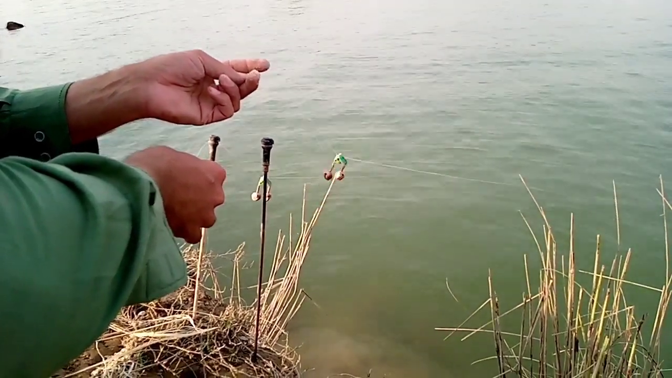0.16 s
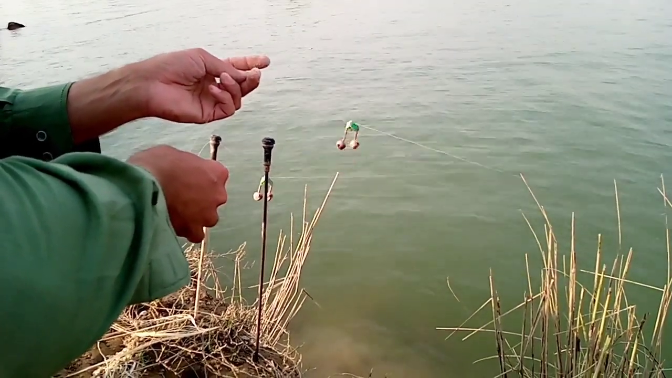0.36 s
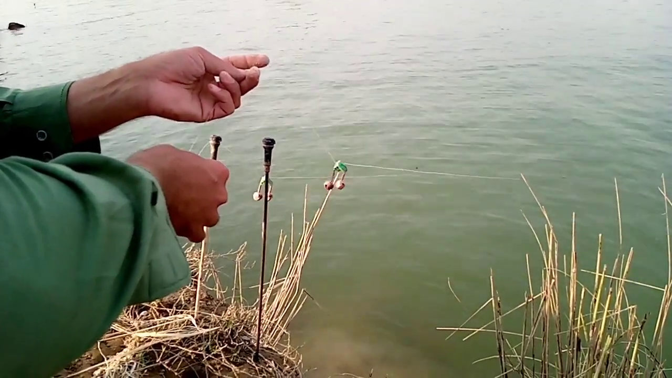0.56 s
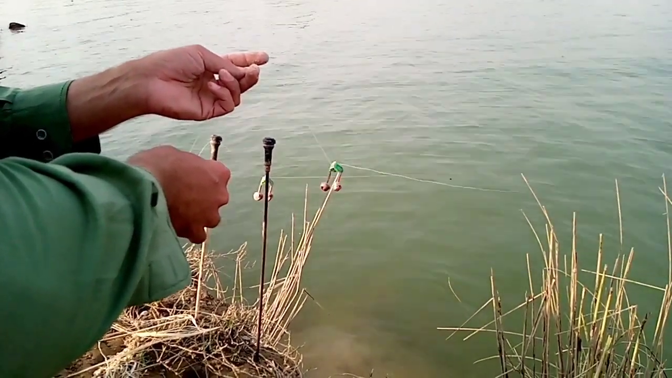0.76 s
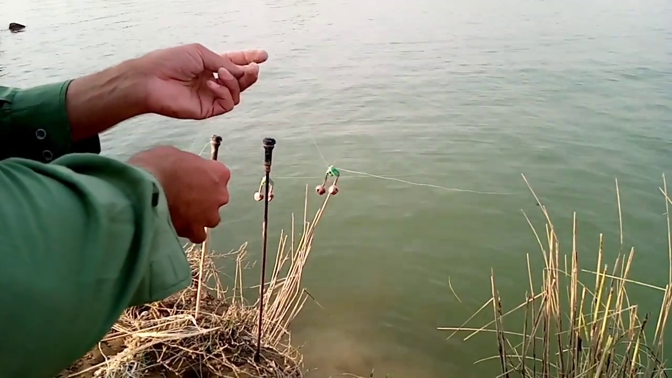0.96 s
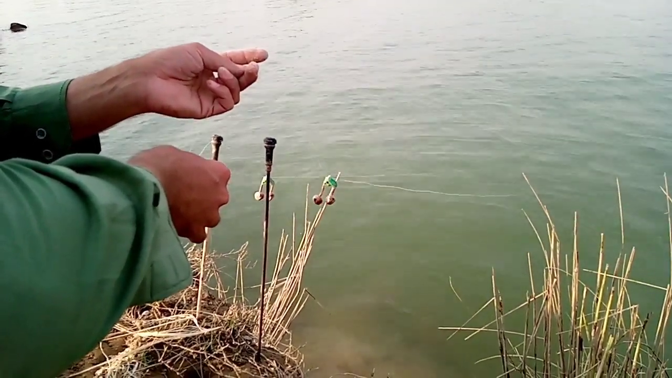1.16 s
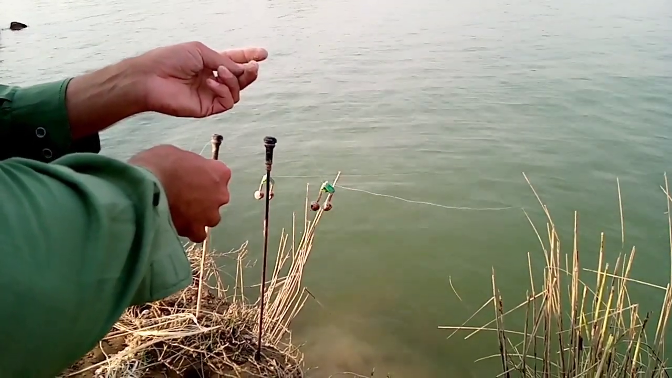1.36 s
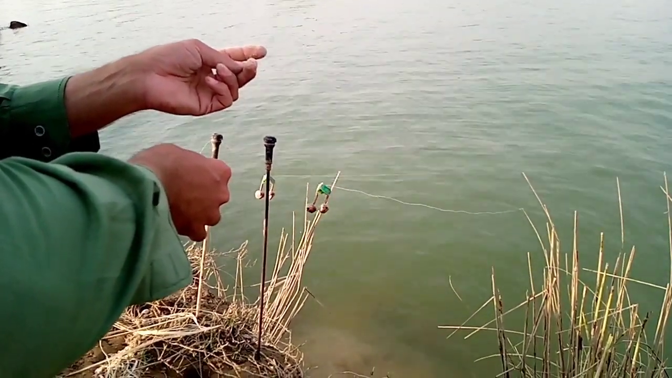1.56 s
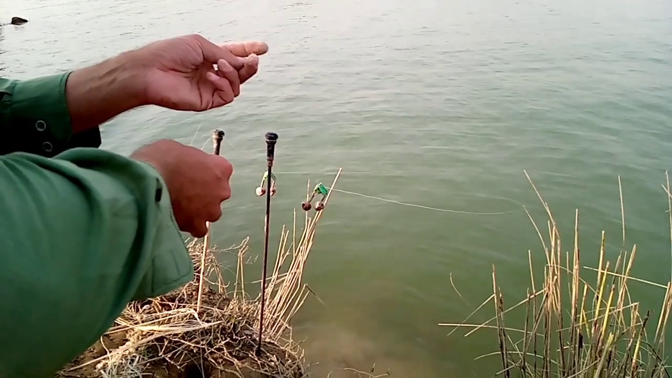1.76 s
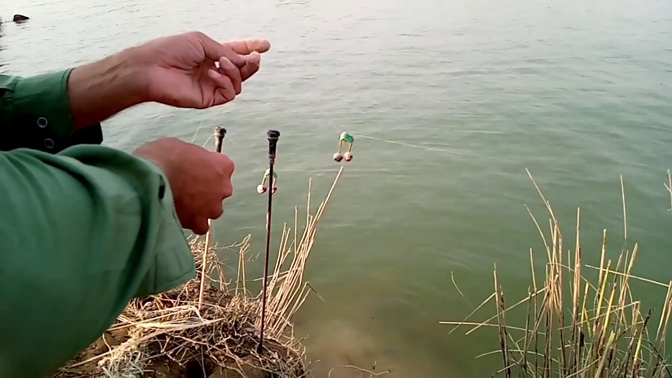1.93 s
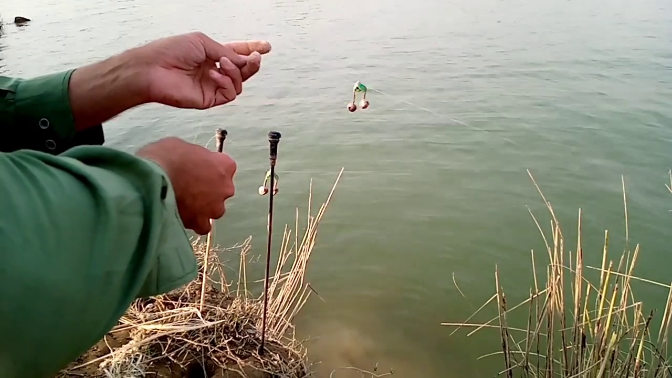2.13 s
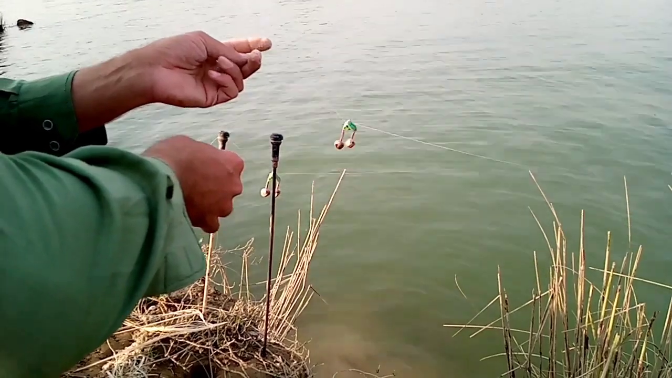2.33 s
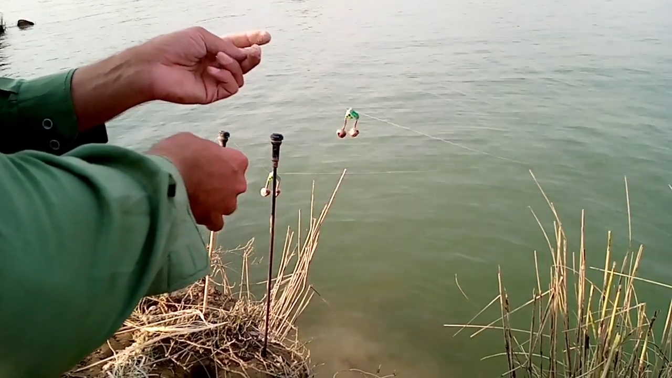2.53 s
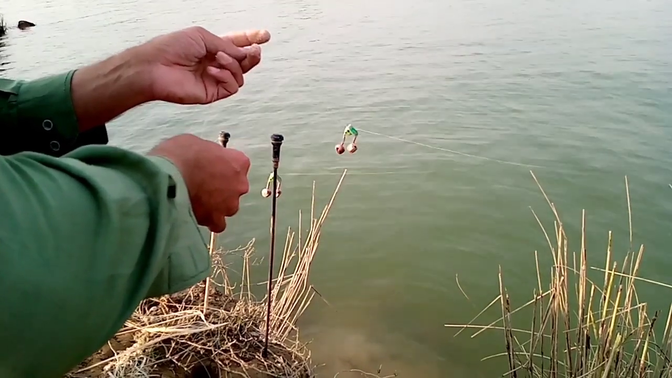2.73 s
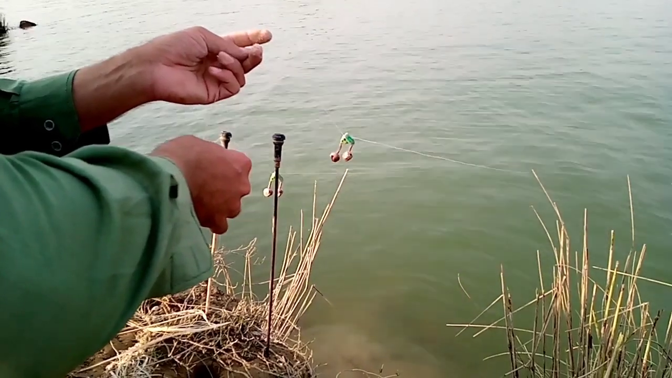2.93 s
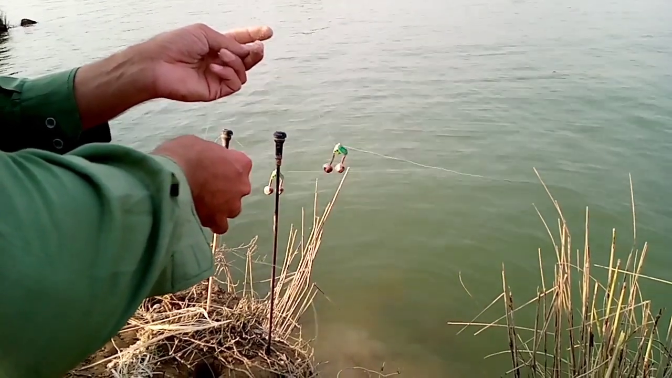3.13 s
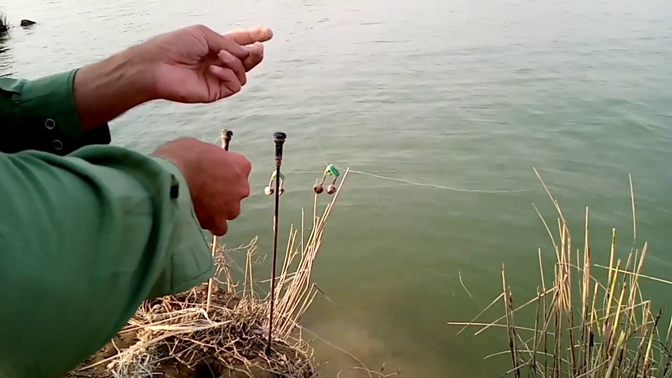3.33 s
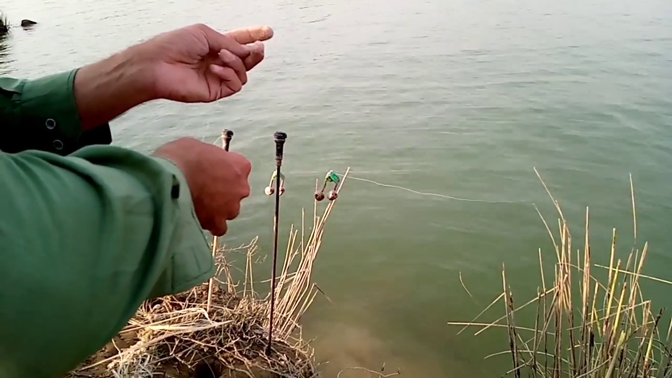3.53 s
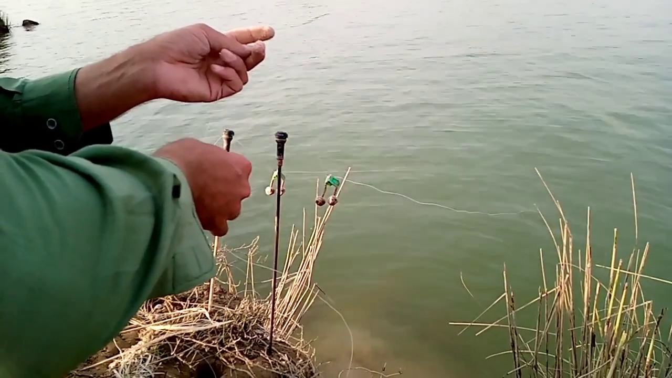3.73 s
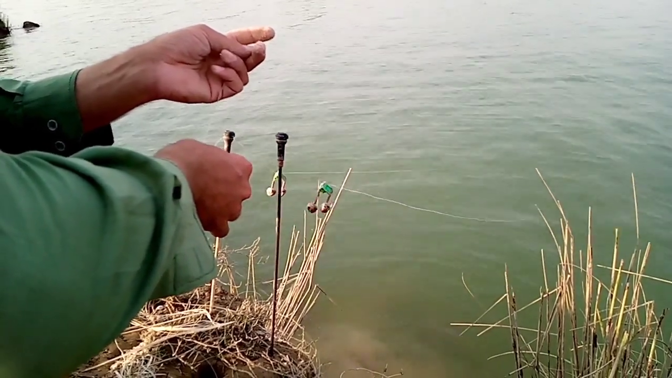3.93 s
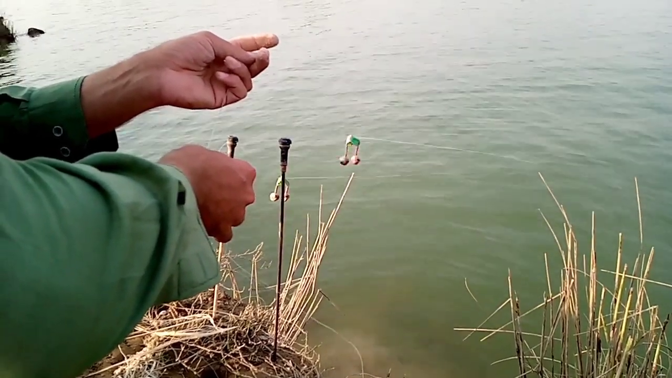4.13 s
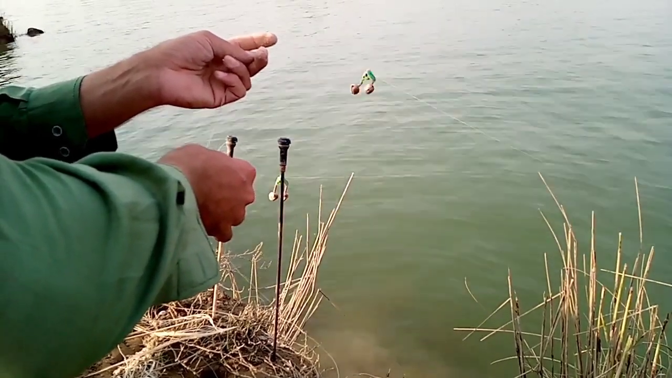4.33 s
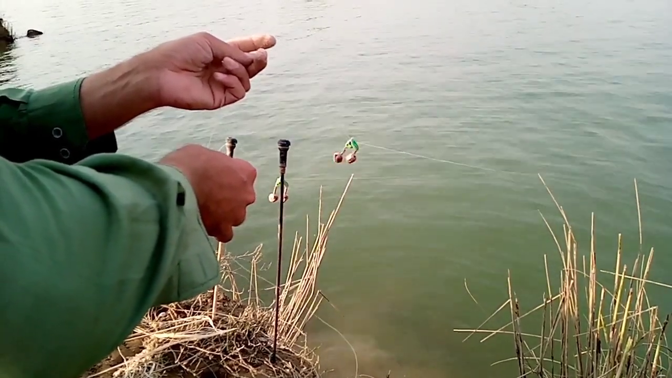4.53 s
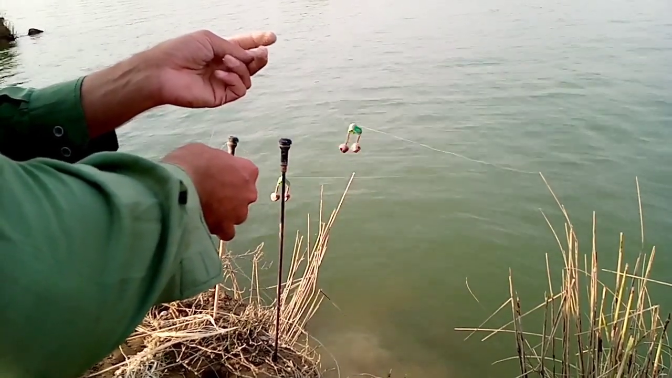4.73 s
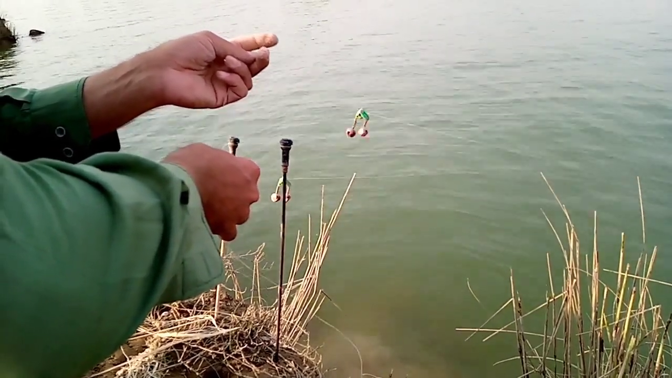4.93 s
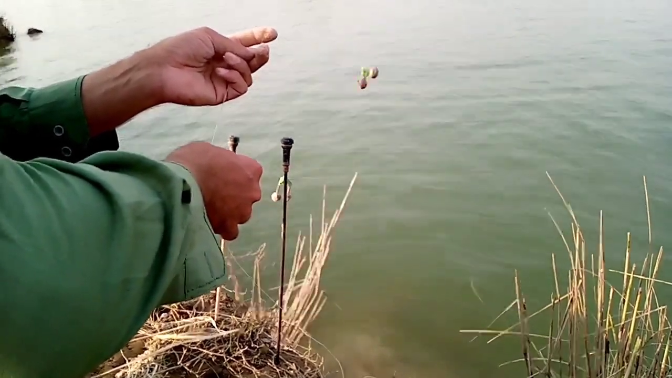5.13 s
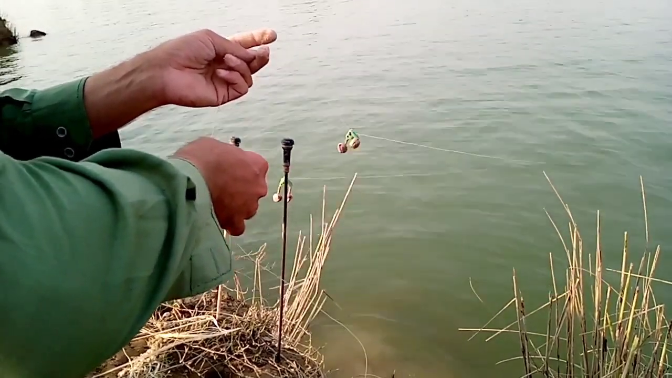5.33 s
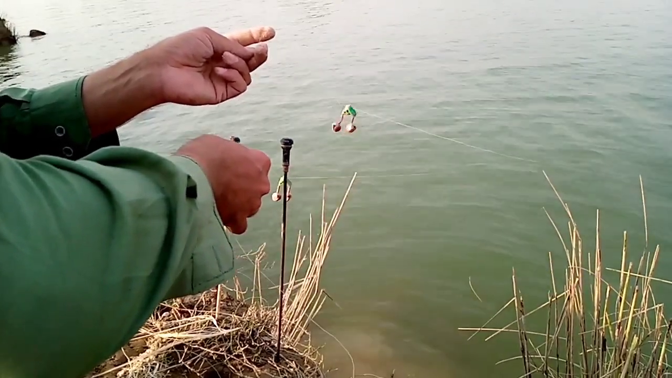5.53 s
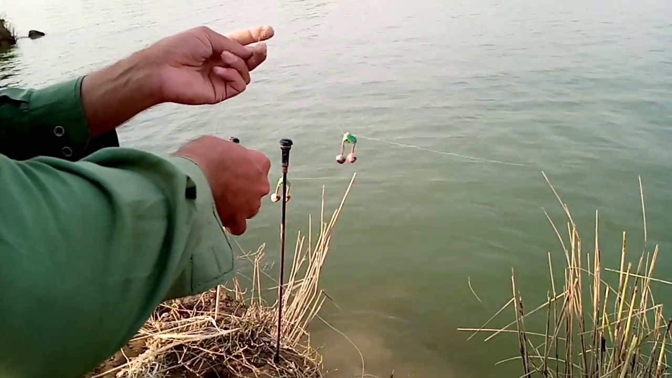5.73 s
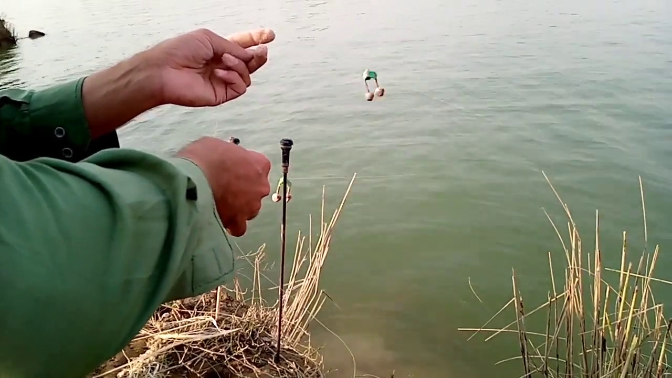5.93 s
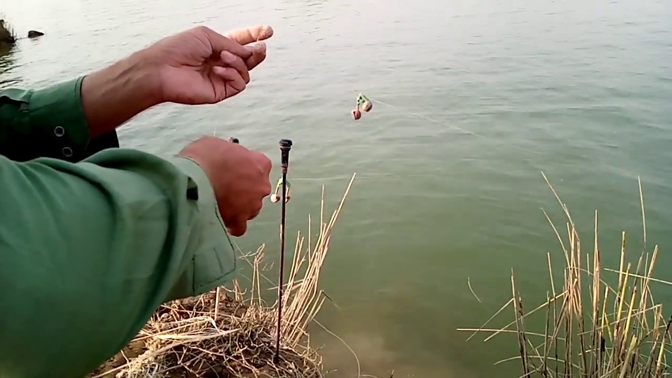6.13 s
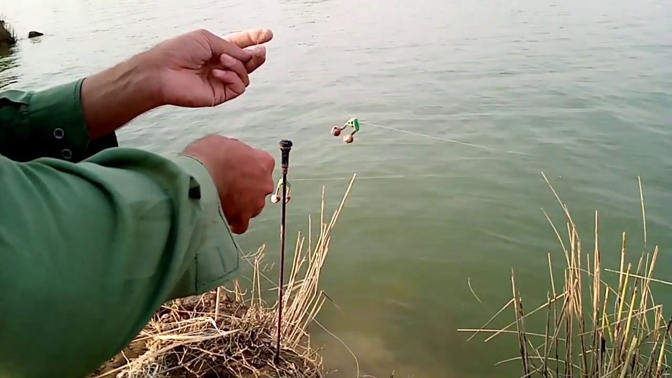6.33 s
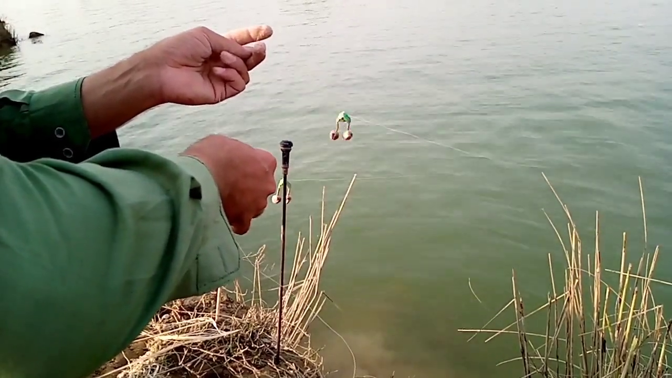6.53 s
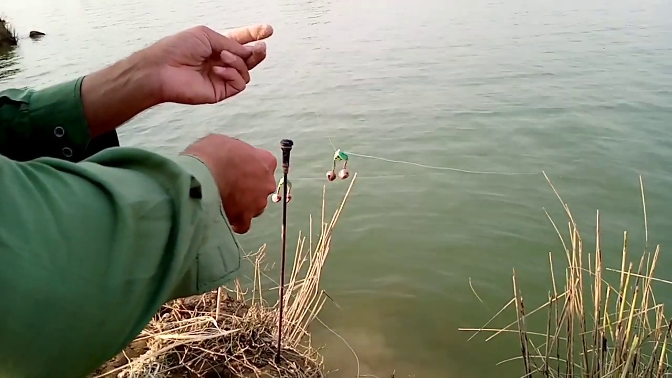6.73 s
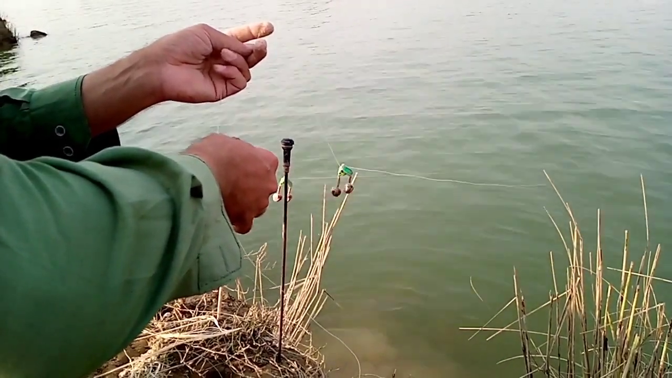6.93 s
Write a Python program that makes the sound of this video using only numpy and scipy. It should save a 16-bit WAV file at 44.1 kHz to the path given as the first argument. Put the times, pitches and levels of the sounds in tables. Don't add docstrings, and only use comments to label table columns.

```python
import sys
import numpy as np
from scipy import signal
from scipy.io import wavfile

SR = 44100
rng = np.random.default_rng(int(sys.argv[2]) if len(sys.argv) > 2 else 0)


def log_audio(samples):
    frames = np.atleast_2d(samples).T
    limited = np.clip(frames, -1, 1)
    pcm = np.round(limited * 32767).astype(np.int16)
    wavfile.write(sys.argv[1], SR, pcm)


def elevation(decibels):
    levels = np.asarray(decibels, float)
    return 10 ** (levels / 20)


N = 308259
TIME = np.arange(N) / SR


def rms_one(x):
    return x / np.sqrt(np.mean(x ** 2) + 1e-20)


def low_pass(x, hz):
    r = np.exp(-2 * np.pi * hz / SR)
    return signal.lfilter([1 - r], [1, -r], x)


def band_pass(x, low_hz, high_hz, order):
    return signal.sosfilt(signal.butter(order, [low_hz, high_hz], "band", fs=SR, output="sos"), x)


def drift(rate_hz):
    thin = 40
    r = np.exp(-2 * np.pi * rate_hz * thin / SR)
    white = rng.standard_normal(N // thin + 2002)
    slow = signal.lfilter([1], [1, -2 * r, r * r], white)[2000:]
    return np.interp(np.arange(N) / thin, np.arange(len(slow)), rms_one(slow))


def ring(clicks, hz, t60):
    r = 10 ** (-3 / (t60 * SR))
    w = 2 * np.pi * hz / SR
    return signal.lfilter([0, np.sin(w)], [1, -2 * r * np.cos(w), r * r], clicks + 1e-18)


def banded_noise(spectrum, patchy_db, rate_hz):
    hz, db = np.transpose(spectrum)
    edges = np.geomspace(hz[0], hz[-1], 16)
    white = rng.standard_normal((2, N + SR))
    together = drift(2.47)
    out = 0
    for k, (low, high) in enumerate(zip(edges, edges[1:])):
        band = band_pass(white[k % 2], low, high, order=2)[SR:]
        level_db = np.interp(np.log(low * high) / 2, np.log(hz), db)
        flicker_db = patchy_db * (.5 * together + drift(rate_hz))
        out = out + band * elevation(level_db + flicker_db)
    return rms_one(out)


# (f/Hz, level/dB per Hz)
AIR_SPECTRUM = [(190, -22), (270, -4), (630, -7.5), (1600, -9), (3000, -10.5), (4300, -11), (6000, -11.5)]


def open_air():
    return elevation(-75.5) * banded_noise(AIR_SPECTRUM, patchy_db=3.0, rate_hz=40)


# (f/Hz, level/dB per Hz)
RUMBLE_SPECTRUM = [(28, -24), (60, -8), (100, 1.5), (135, -1.5), (260, -25.5)]
# (t/s, level/dB)
RUMBLE_SWELL = [
    (0, 3),
    (.7, 0.5),
    (1.4, 0),
    (2.25, 4),
    (2.9, 0.5),
    (3.6, -0.5),
    (4.3, -1.5),
    (4.8, 0),
    (6.3, 3.5),
    (7, -1.5),
]


def traffic_rumble():
    level_db = -67 + np.interp(TIME, *np.transpose(RUMBLE_SWELL)) + 1.97 * drift(20)
    return elevation(level_db) * banded_noise(RUMBLE_SPECTRUM, patchy_db=3.5, rate_hz=3.3)


# (f/Hz, level/dB per Hz)
HISS_SPECTRUM = [(5500, -2), (9000, -11), (13600, -11.5), (15000, -5.5), (16500, 1)]


def microphone_hiss():
    return elevation(-80) * banded_noise(HISS_SPECTRUM, patchy_db=-1.0, rate_hz=5.9)


def wing_strokes(s, level_db, hz, length, sag_hz):
    out, t = np.zeros(N + SR), np.arange(int(length * SR)) / SR
    swell = np.sin(np.pi * t / length) ** 0.91
    for at, db, f, turn in zip(s, level_db, hz, rng.random(len(s))):
        i = int(max(at, 0) * SR)
        cycles = f * t - sag_hz * t ** 2 / length + turn
        out[i:i + len(t)] += elevation(db) * swell * np.sin(2 * np.pi * cycles)
    return out[:N]


# (first chirp t/s, last chirp t/s, first f/Hz,
# last f/Hz)
CRICKET_BOUTS = [(0, .361, 7330, 7390), (.03, .157, 6900, 6920), (.251, .251, 6700, 6620),
                 (0.336, .924, 6570, 6750), (0.891, .889, 7360, 7100), (1.03, 1.704, 7370, 7340),
                 (1.209, 1.209, 6820, 6680), (1.487, 2.322, 6770, 6960), (2.432, 2.988, 7256, 7390),
                 (2.564, 2.913, 6610, 6750), (3.069, 3.143, 6940, 6750), (3.293, 3.76, 6880, 7140),
                 (3.899, 4.482, 6680, 6760), (3.919, 3.921, 7300, 7240), (4.005, 4.562, 7340, 7420),
                 (4.553, 5.118, 6940, 7040), (4.888, 4.889, 6650, 6650), (5.135, 5.61, 6610, 6760),
                 (5.238, 5.238, 7540, 7540), (5.37, 5.815, 7300, 7350), (5.876, 6.432, 6915, 6980),
                 (6.219, 6.219, 6600, 6630), (6.533, 6.961, 7380, 7480), (6.554, 6.813, 6780, 6710)]


def chirp_times():
    chirp_s = .115
    runs = []
    for s0, s1, hz0, hz1 in CRICKET_BOUTS:
        runs.append(np.linspace([s0, hz0], [s1, hz1], round((s1 - s0) / chirp_s) + 1))
    s, hz = np.concatenate(runs).T
    return s, hz + 35.0 * rng.standard_normal(len(s))


# (start t/s, end t/s, level/dB)
CRICKET_TRILLS = [
    (.98, 1.72, -79),
    (3.3, 4.0, -79),
]


def crickets():
    s, hz = chirp_times()
    level_db = np.where(hz > 7200, -69, -64) + rng.normal(0, 0.17, len(s))
    step = np.arange(5) - 2
    fade_db = np.array([-2.5, 1.0, 0.0, 2, -6.0])
    luck = rng.standard_normal((len(s), 3, 5)) * [[.0004], [1.5], [25]]
    stroke_s = s[:, None] + step / 72 - .005 + luck[:, 0]
    stroke_db = level_db[:, None] + 6.0 + fade_db + luck[:, 1]
    stroke_hz = hz[:, None] + 230 + 25 * step + luck[:, 2]
    near = wing_strokes(stroke_s.ravel(), stroke_db.ravel(), stroke_hz.ravel(), length=0.009, sag_hz=235)
    low = band_pass(near, 6200, 7150, order=2)
    near += elevation(-7) * np.roll(low, int(.0061 * SR))
    for start, end, db in CRICKET_TRILLS:
        at = np.arange(start, end, 1 / 57)
        rise = np.minimum((at - start) / 0.2, 1)
        trill_db = db + rng.normal(0, 2.5, 99)[:len(at)]
        near += wing_strokes(at, trill_db, 7750 + 270 * rise, length=.009, sag_hz=60)
    white = rng.standard_normal(N)
    low_choir_db = -70.5 + 2.5 * drift(32) + 2.2 * drift(71)
    chorus = rms_one(band_pass(white, 6340, 6785, order=3)) * elevation(low_choir_db)
    chorus += rms_one(band_pass(white, 6800, 7350, order=3)) * elevation(-80 + 2.5 * drift(3))
    return near + chorus


# (start t/s, end t/s, start f/Hz, end f/Hz, level/dB)
BIRD_AND_FROG_CALLS = [(.612, .736, 2550, 2030, -76), (.74, .997, 2034, 1710, -73.5),
                       (1.03, 1.256, 1478, 1342, -70.5), (1.125, 1.26, 3370, 2660, -86),
                       (1.168, 1.419, 2250, 1917, -76), (1.32, 1.5, 2530, 2330, -80),
                       (1.101, 1.274, 1800, 1610, -75.5), (1.07, 1.15, 1080, 710, -75.5),
                       (2.542, 2.626, 908, 898, -80.5), (2.684, 2.919, 1735, 1591, -76),
                       (3.842, 4.257, 1780, 1638, -75), (4.23, 4.32, 860, 885, -76.5),
                       (5.678, 5.973, 1428, 1484, -78), (5.72, 5.955, 1888, 1780, -76.5),
                       (5.782, 5.932, 830, 847, -76), (6.659, 6.886, 1423, 1396, -77.5),
                       (6.885, 6.95, 2500, 1900, -82), (6.94, 7.02, 3740, 3350, -71),
                       (4.905, 4.925, 7300, 3200, -61), (0.15, .29, 1200, 1002, -78.5)]


def far_calls():
    hoarse_share, clear_above_hz = 0.077, 2670
    out, luck = np.zeros(N), rng.random((170, 5))
    start, hz = 6.9 * luck[:, 0], 1100 * 4.5 ** luck[:, 1]
    end = start + .03 + 0.054 * luck[:, 2]
    end_hz = hz * (0.88 + 0.11 * luck[:, 3])
    murmur = np.transpose([start, end, hz, end_hz, -92 + 8.4 * luck[:, 4]])
    for start, end, hz_a, hz_b, level_db in [*BIRD_AND_FROG_CALLS, *murmur]:
        hoarse_hz = hoarse_share * hz_b
        rough = 1 / (1 + (hz_b / clear_above_hz) ** 8)
        i = int(start * SR)
        u = np.linspace(0, 1, int((end - start) * SR))[:N - i]
        white = rng.standard_normal(SR // 2)[:len(u)]
        flutter = rms_one(low_pass(low_pass(white, hoarse_hz), hoarse_hz))
        tone = np.sin(2 * np.pi * np.cumsum(hz_a * (hz_b / hz_a) ** u) / SR)
        swell = np.sin(np.pi * u) ** 0.25
        voice = 1.5 - 0.82 * rough + rough * flutter
        out[i:i + len(u)] += elevation(level_db + 2.5) * swell * voice * tone
    t = np.arange(SR // 5) / SR
    scatter = rng.standard_normal(len(t)) * elevation(-60 * t / 0.12)
    smear = signal.fftconvolve(out, scatter / np.linalg.norm(scatter))[:N]
    return out + elevation(-0.5) * smear


# (t/s, peak level/dB, f/Hz, cycles rung)
SNAPS_DRIPS_AND_TINKLES = [(.161, -43.5, 4000, 5.6), (1.071, -39, 8640, 17), (1.309, -47.5, 1920, 4),
                           (1.834, -45, 2400, 62), (1.82, -48.5, 4130, 16), (1.838, -49, 8940, 3.1),
                           (3.042, -45.5, 5100, 16.7), (3.654, -61, 2580, 11), (3.666, -47, 3900, 11),
                           (4.232, -55.5, 1617, 57), (4.232, -65, 814, 67), (4.264, -56, 1396, 90),
                           (4.377, -58.5, 1940, 49), (5.865, -54.5, 1373, 25), (4.749, -49.5, 195, 4),
                           (4.79, -57, 297, 3.6), (5.621, -57, 193, 31), (6.038, -49.5, 2720, 44),
                           (6.2, -51, 1902, 6.7), (.175, -51, 1210, 5.7), (4.566, -56.5, 2220, 9.4),
                           (4.771, -58.5, 525, 9.2), (6.418, -55.5, 2800, 40), (0.161, -48, 9040, 9.9),
                           (0.201, -51, 3810, 81), (0.254, -55, 4090, 250), (.493, -56, 4200, 45),
                           (0.705, -57, 4200, 120), (0.773, -57.5, 4270, 170), (3.315, -61, 4200, 91)]


def ticks():
    out, t = np.zeros(N), np.arange(4000) / SR
    for s, peak_db, hz, cycles in SNAPS_DRIPS_AND_TINKLES:
        rustles = (cycles < 16) * (hz < 6000)
        envelope = np.exp(-t / 0.0017) + 0.24 * rustles * np.exp(-t / 0.038)
        burst = rng.standard_normal(len(t)) * envelope
        snap = ring(ring(burst, hz, cycles / hz), hz, 5.7 / hz)
        i = int(s * SR)
        out[i:i + len(t)] += elevation(peak_db) * snap / np.abs(snap).max()
    return out


def bell_tone(s, peak_db, hz, t60):
    last = np.maximum(np.searchsorted(s, TIME, "right") - 1, 0)
    level = elevation(peak_db[last] - 60 * (TIME - s[last]) / t60[last]) * (TIME >= s[0])
    left = elevation(peak_db[:-1] - 60 * np.diff(s) / t60[:-1] - peak_db[1:])
    fresh = np.clip(1 - np.append(0, left), 0, 1)
    jolt = fresh * rng.uniform(-np.pi, np.pi, len(s))
    rolling = hz[last] * (1 + 0.00394 * drift(74.8))
    phase = 2 * np.pi * np.cumsum(rolling) / SR + low_pass(np.cumsum(jolt)[last], 530)
    return low_pass(low_pass(level, 630), 630) * elevation(2.8 * drift(160)) * np.sin(phase)


def pellet_clack(s, blow_db, t60):
    rebound_s, rebound_loss_db = .011, 7.5
    clean_db = 0.5 * np.log2(t60 / 0.099)
    clicks = np.zeros(N)
    first = (s * SR).astype(int)
    clicks[first] = elevation(1.13 * (blow_db + 31) - 37 - clean_db + rng.normal(0, 1.36, len(s)))
    again = rng.random((len(s), 2, 3))
    later = s[:, None] + np.cumsum(rebound_s * (.4 + 1.2 * again[:, 0]), axis=1)
    loss_db = rebound_loss_db * (np.arange(3) + 2 * again[:, 1])
    clicks[(later * SR).astype(int)] = clicks[first, None] * elevation(-loss_db)
    decay = signal.lfilter([1], [1, -elevation(-60 / (.026 * SR))], clicks)
    return low_pass(decay, 250) * rng.standard_normal(N) * elevation(4 * drift(150))


# (f/Hz, level/dB against the strike, t60/s)
SHELL_OVERTONES = [
    (8330, -30.5, 0.054),
    (9150, -29, 0.14),
    (10315, -28.5, 0.077),
]
# (t/s, high bell peak level/dB, low bell
# peak level/dB, t60/s)
BELL_STRIKES = [(.544, -51, -68, 0.036), (.919, -57.5, -82, 0.12), (1.175, -52, -84, 0.047),
                (1.304, -56.5, -89, 0.04), (1.436, -52.5, -83, .045), (1.7803, -50, -74, 0.03),
                (1.855, -50.5, -58.5, .032), (1.9945, -33.5, -67, 0.044), (2.0177, -47, -70, .1),
                (2.0506, -45.5, -47.5, 0.12), (2.0852, -38.5, -37, .26), (2.095, -33, -38, .15),
                (2.111, -25, -40.5, 0.095), (2.153, -41.5, -56.5, 0.1), (2.179, -42, -68, 0.085),
                (2.203, -37.5, -46, 0.21), (2.2317, -34.5, -44.5, .084),
                (2.2536, -31.5, -50.5, .055), (2.2729, -38.5, -52.5, 0.042),
                (2.3257, -44.5, -46, .2), (2.3347, -64, -39.5, 0.11), (2.39, -47.5, -41, 0.072),
                (2.5288, -44.5, -50.5, .11), (2.569, -45.5, -55, 0.13), (2.6625, -46.5, -50, 0.097),
                (2.743, -42, -47, 0.081), (2.7976, -45.5, -42, 0.07), (2.842, -42, -46, 0.045),
                (2.926, -56, -88, .052), (2.3052, -57, -56, 0.063),
                (3.9472, -44.5, -54.5, 0.027), (3.971, -45.5, -65, 0.049),
                         (4.2497, -38, -47, 0.082), (4.282, -58, -46, 0.19), (4.3573, -52, -55.5, 0.69),
                         (4.394, -40.5, -55.5, 0.3), (4.4262, -31.5, -57, .036), (4.438, -41, -66, 0.079),
                         (4.4514, -34.5, -50, 0.047), (4.504, -53.5, -46.5, .039), (4.571, -51, -31, .024),
                         (4.599, -45, -34, 0.043), (4.6468, -42, -37, 0.056), (4.6695, -43.5, -41, 0.14),
                         (4.767, -49.5, -44.5, 0.08), (4.8397, -53.5, -54, .078),
                (4.9542, -63.5, -58, .37), (4.984, -45.5, -42, 0.2), (4.992, -44.5, -37, 0.11),
                        (5.019, -32, -44, 0.1045), (5.1084, -52, -65, .18), (5.1714, -33.5, -40, 0.12),
                        (5.1918, -27, -52, 0.077), (5.1982, -27, -53.5, 0.2), (5.2093, -29.5, -43, .2),
                        (5.2242, -19.5, -31, 0.12), (5.2327, -26.5, -20, .04), (5.2409, -35, -37, .16),
                        (5.251, -35.5, -27, 0.023), (5.2769, -50.5, -75, 0.042), (5.292, -43, -48, .024),
                        (5.313, -33.5, -45, 0.033), (5.38, -38.5, -30, 0.027), (5.399, -41.5, -40, 0.044),
                        (5.4803, -41.5, -34.5, 0.13), (5.5541, -44, -40.5, .19), (5.558, -32, -44, .094),
                        (5.6023, -30.5, -51, 0.13), (5.619, -36.5, -49, 0.17), (5.667, -45, -40, 0.096),
                        (5.6903, -43.5, -37.5, .044), (5.697, -38.5, -50, 0.12), (5.721, -39, -57, 0.077),
                        (5.772, -63, -46.5, .027),
                (6.0, -41.5, -50, 0.18), (6.035, -33.5, -42.5, 0.04), (6.0558, -31.5, -45, 0.088),
                       (6.0907, -40.5, -27.5, .13), (6.1134, -37, -32, .11), (6.1404, -19, -35, 0.13),
                       (6.171, -20, -25, 0.037), (6.1865, -44.5, -37, .19), (6.1971, -29, -35, 0.046),
                       (6.2345, -45.5, -33, 0.015), (6.2488, -47, -52.5, 0.086), (6.2932, -39, -50, 0.31),
                       (6.3027, -26.5, -50.5, 0.042), (6.3185, -28.5, -53, 0.09), (6.3647, -41, -61, 0.088),
                       (6.375, -46, -28.5, 0.056), (6.401, -28, -35, .045), (6.4235, -29, -42.5, 0.1),
                       (6.4504, -37.5, -31.5, 0.083), (6.4826, -37.5, -56.5, 0.078),
                       (6.4923, -34, -58.5, 0.046), (6.5119, -39, -47, .14), (6.542, -46.5, -44, 0.15),
                       (6.5997, -43, -45, .1), (6.6479, -38.5, -44, .045), (6.6877, -28.5, -38, 0.085),
                       (6.7073, -42.5, -44, 0.11), (6.7673, -56.5, -50.5, 0.078), (6.809, -63, -53, .11),
                       (6.817, -61, -51, .094)]


def bells():
    high_bell_hz, low_bell_hz = 4209, 3823
    strikes = BELL_STRIKES
    s, high_db, low_db, t60 = np.transpose(sorted(strikes))
    choke_hz = 120 * np.exp(-t60 / 0.027)
    sag_hz = 2.5 * (high_db + 35.5)
    high_hz = high_bell_hz + choke_hz - sag_hz + 15 * rng.standard_normal(len(s))
    low_hz = low_bell_hz + rng.normal(0, 15, len(s))
    t60, blow_db = np.clip(t60, .01, 1), np.maximum(high_db, low_db)
    softer_db = 0.73 * np.maximum(high_db - low_db - 8, 0)
    out = bell_tone(s, high_db + 1.0, high_hz, t60)
    out += bell_tone(s, low_db - 1.5 - softer_db, low_hz, t60 * 1.02)
    luck = rng.standard_normal((len(s), 2, len(SHELL_OVERTONES)))
    for k, (hz, level_db, decay) in enumerate(SHELL_OVERTONES):
        off_node_db = -17 * np.abs(luck[:, 0, k])
        overtone_db = 0.97 * blow_db + level_db + off_node_db
        overtone_hz = hz * (1 + 0.0057 * luck[:, 1, k])
        out += bell_tone(s, overtone_db, overtone_hz, np.minimum(t60, decay))
    clack = pellet_clack(s, blow_db, t60)
    out += elevation(4) * band_pass(clack, 3690, 4970, order=3)
    out += elevation(-7.5) * band_pass(clack, 3700, 5900, order=3)
    out += elevation(-35) * band_pass(clack, 7500, 11000, order=3)
    out += elevation(-22.5) * band_pass(clack, 14000, 15600, order=3)
    return band_pass(out, 3810, 14000, order=4) + elevation(-18) * band_pass(clack, 3110, 4200, order=3)


def scene():
    air_and_traffic = open_air() + traffic_rumble()
    wildlife = crickets() + far_calls()
    jingle = bells()
    jingle += elevation(-13.0) * np.roll(jingle, int(0.001318 * SR))
    return (air_and_traffic + wildlife + ticks() + jingle)[None]


def roll_off(x):
    return signal.sosfilt(signal.butter(12, 15820, fs=SR, output="sos"), x)


def record(dry):
    hissing = dry + microphone_hiss()
    top = signal.cheby2(16, 28, 15620, fs=SR, output="sos")
    mix = signal.sosfilt(top, hissing)
    return roll_off(mix)


dry = scene()
out = record(dry)
log_audio(out)
```